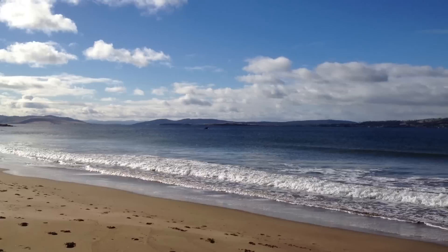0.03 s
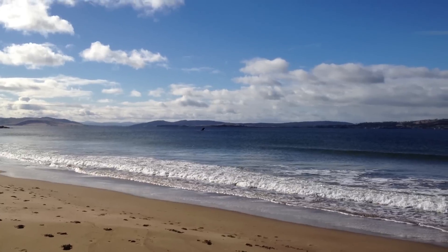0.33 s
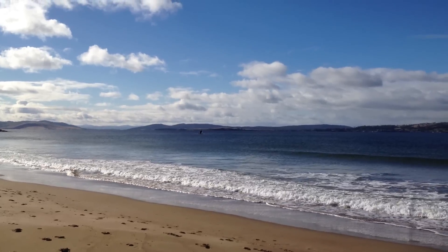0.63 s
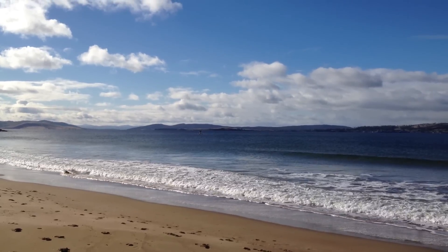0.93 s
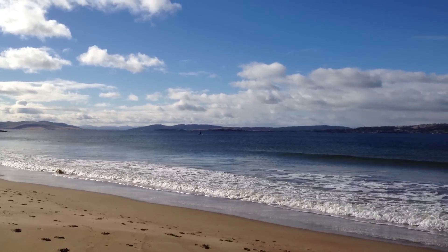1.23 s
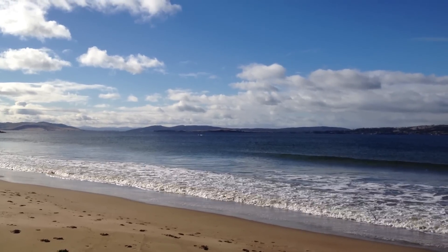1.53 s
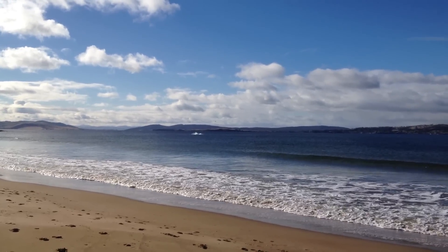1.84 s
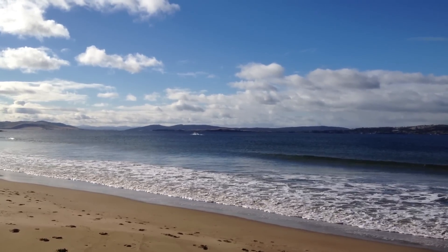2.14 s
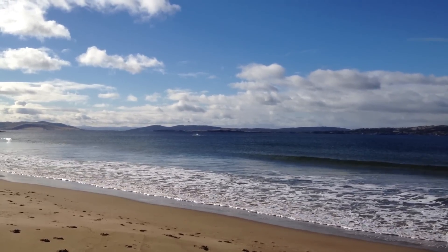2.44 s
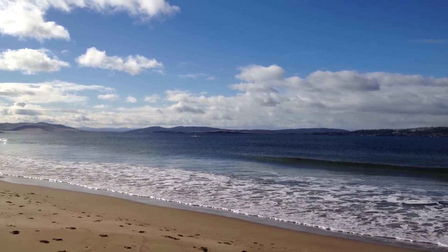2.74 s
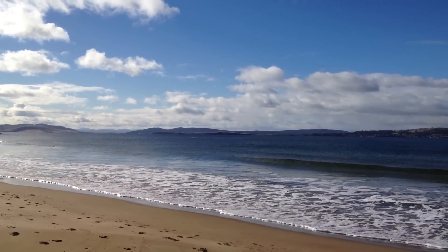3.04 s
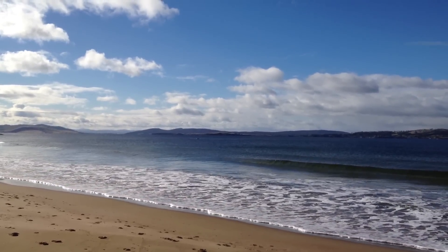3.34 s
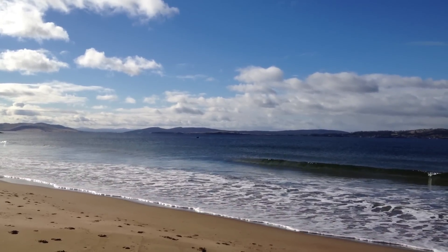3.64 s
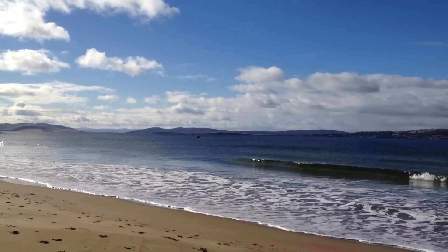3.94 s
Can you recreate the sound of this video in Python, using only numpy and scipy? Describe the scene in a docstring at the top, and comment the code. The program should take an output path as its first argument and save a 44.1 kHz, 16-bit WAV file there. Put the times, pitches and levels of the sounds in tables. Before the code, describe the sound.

A wave washes up a sandy beach while gusts of wind buffet the microphone.

```python
"""Wave on a windy beach

A broken wave rolls up the sand, and the roar of its countless bubbles sinks into a thin hiss of foam.
Nearer bubbles ring in the swash among a few small splashes; fine grains, likely blown sand, tick.
Turbulent wind presses on the microphone in short gusts and sharp buffets, hardest near the end."""
import sys
import numpy as np
from scipy import signal
from scipy.fft import rfft, irfft
from scipy.io import wavfile
from scipy.ndimage import uniform_filter1d

SR = 44100
rng = np.random.default_rng(int(sys.argv[2]) if len(sys.argv) > 2 else 0)


def file_out(sig):
    """Save sig as 16-bit WAV at sys.argv[1]."""
    # one column per channel
    cols = np.atleast_2d(sig).T
    # limit, then scale
    lim = np.clip(cols, -1, 1)
    pcm = np.round(lim * 32767).astype(np.int16)
    wavfile.write(sys.argv[1], SR, pcm)


N = 176400

# Envelopes of the rolling front and of the foam: time_s, relative_level_db
ROAR_LEVEL = [(.05, -36.5), (.6, -36), (1.15, -37), (1.75, -37), (2.1, -37), (2.35, -40), (2.55, -44),
              (2.78, -48), (3.3, -48.5), (3.44, -44), (3.64, -48), (3.9, -45.5)]
HISS_LEVEL = [(0.05, -44.5), (0.08, -44.5), (1.38, -44.5), (1.45, -43), (2.23, -44), (2.79, -50),
              (2.85, -48), (2.96, -50.5), (3.87, -50.5), (4.0, -47.5)]
# Their spectra: frequency_hz, gain_db
ROAR_SPECTRUM = [(30, -50), (70, -23), (150, -2.5), (280, -1), (420, -2), (620, -0.5), (950, -3),
                 (1500, -5.5), (2150, -7.5), (2600, -20), (4500, -38), (9000, -64)]
HISS_SPECTRUM = [(300, -29), (1000, -2), (2100, -0.5), (2600, -0.5), (3200, 2), (4200, -1.5), (5400, -4.5),
                 (6300, -4), (7900, -4), (9700, -13.5), (11500, -21), (13700, -18.5), (15400, -22)]

def white_water(roar_gain_db=1.5, hiss_gain_db=1.45):
    """Incoherent bubble sounds add up to noise: a low roar at the front, a hiss in the foam."""
    roar = amp(roar_gain_db + curve(ROAR_LEVEL)) * churn(ROAR_SPECTRUM, patchy_db=1.25)
    hiss = amp(hiss_gain_db + curve(HISS_LEVEL)) * churn(HISS_SPECTRUM, patchy_db=.88)
    return roar + hiss


def churn(spectrum, patchy_db, flicker_db=.5):
    """A bubble cloud is noise modulated in amplitude, both in patches and across all bands at once."""
    frames = signal.stft(rng.standard_normal(N), nperseg=512, noverlap=384)[2].T
    drift = uniform_filter1d(rng.standard_normal(frames.shape), size=18, axis=0)
    patches = unit_rms(uniform_filter1d(drift, size=8, axis=1))
    flicker = unit_rms(uniform_filter1d(rng.standard_normal(len(frames)), size=7))[:, None]
    frames *= amp(patchy_db * patches + flicker_db * flicker)
    return coloured(signal.istft(frames.T, nperseg=512, noverlap=384)[1][:N], spectrum)


def bubbles(sizes=30, per_s=1400, level_db=-56.5, decay_cycles=7.9):
    """Each near bubble is a damped oscillator whose pitch rises as it rings down."""
    t, out = np.arange(0, .04, 1 / SR), np.zeros(N)
    for hz in np.geomspace(700, 8000, sizes):
        age = t * hz / decay_cycles
        glide = 1 + .03 * np.minimum(age, 4)
        ring = np.sin(2 * np.pi * hz * t * glide) * np.exp(-age)
        out += signal.oaconvolve(impulses(per_s / sizes, spread_db=1), ring)[:N]
    foam_envelope = amp(.42 * curve(HISS_LEVEL))
    return amp(level_db) * unit_rms(out * foam_envelope)


# Puffs of spray: centre_s, level_db, centre_hz, sigma_hz, sigma_s
SPLASH_EVENTS = [(2.838, -49.5, 2500, 590, .012), (3.252, -42.5, 2820, 700, 0.0041),
                 (3.271, -46, 13600, 1300, 0.0027), (3.272, -52, 8000, 1200, .004),
                 (3.397, -46, 3600, 1300, 0.0046)]

def splashes():
    """Spray radiates bursts of band-limited noise, Gaussian in time and in frequency."""
    t, f, out = np.arange(N) / SR, np.fft.rfftfreq(N, 1 / SR), np.zeros(N)
    for centre_s, db, hz, sigma_hz, sigma_s in SPLASH_EVENTS:
        band = gaussian(f - hz, sigma_hz)
        spray = unit_rms(irfft(rfft(rng.standard_normal(N)) * band, N))
        out += amp(db) * spray * gaussian(t - centre_s, sigma_s)
    return out


# Gusts on the microphone: start_s, length_s, level_db
GUST_EVENTS = [(0.199, 0.079, -32), (0.358, 0.018, -31), (.552, 0.058, -33), (0.86, 0.058, -29.5),
               (1.352, 0.073, -31), (1.507, 0.043, -34), (1.56, 0.018, -23), (1.602, 0.047, -23.5),
               (1.703, 0.051, -27.5), (1.785, .10, -30.5), (1.898, 0.033, -30), (1.986, 0.044, -33.5),
               (2.269, .045, -32), (2.438, 0.056, -23), (2.494, .128, -36), (2.821, 0.16, -33.5),
               (2.985, 0.052, -32), (3.057, 0.049, -33), (3.161, .052, -30), (3.601, 0.16, -33.5),
               (3.773, 0.018, -23), (3.799, 0.026, -18.5), (3.837, 0.11, -22.5), (3.972, .04, -23.5)]
# Spectra of the low flutter and of its rough edge: frequency_hz, gain_db
FLUTTER_SPECTRUM = [(25, -46), (45, -32), (80, -16.5), (125, -3), (175, 2.5), (255, -3.5), (320, -16.5),
                    (430, -23.5), (700, -34.5), (1500, -56), (3000, -100)]
EDGE_SPECTRUM = [(30, -31), (100, 1), (220, -4), (340, 3), (500, -7.5), (800, -19), (1300, -32),
                 (2500, -55), (4000, -90)]

def gusts(breeze_db=-49, attack_s=.0094, release_s=.011, edge_db=-5, reference_db=-22.5):
    """Turbulent pressure flutters on the microphone; a rough edge grows as its amplitude squared."""
    t, power = np.arange(N) / SR, np.full(N, amp(breeze_db) ** 2)
    for start, length, db in GUST_EVENTS:
        rise = (1 + np.tanh(2 * (t - start) / attack_s)) / 2
        fall = (1 + np.tanh(2 * (start + length - t) / release_s)) / 2
        power += amp(db) ** 2 * rise * fall
    strength = np.sqrt(power)
    flutter = coloured(rng.standard_normal(N), FLUTTER_SPECTRUM)
    local_power = uniform_filter1d(uniform_filter1d(flutter ** 2, size=1000), size=700)
    flutter /= np.sqrt(local_power + 1e-6)  # steadied, so the gusts set its level
    edge_gain = amp(edge_db) * strength / amp(reference_db)
    edge = edge_gain * coloured(rng.standard_normal(N), EDGE_SPECTRUM)
    return strength * (flutter + edge)


# Eddies striking the microphone: centre_s, peak_db, centre_hz
EDDIES = [(.250, -12.5, 150), (0.291, -21, 158), (0.301, -21.5, 176), (.594, -22.5, 194),
          (.885, -17.5, 186), (.905, -29, 178), (1.368, -15.5, 203), (1.421, -26, 170), (1.622, -16, 172),
          (1.638, -14.5, 200), (1.642, -19, 520), (1.728, -19, 328), (1.735, -11.5, 174),
          (1.790, -19.5, 190), (1.807, -21.5, 170), (1.851, -15.5, 222), (1.871, -11, 160),
          (2.003, -20, 180), (2.441, -11, 245), (2.463, -11, 190), (2.474, -11, 180), (2.516, -19.5, 190),
          (2.542, -22.5, 173), (2.848, -23.5, 158), (2.873, -22, 159), (2.927, -19.5, 192),
          (2.947, -21, 268), (3.001, -20.5, 170), (3.093, -29, 179), (3.277, -30.5, 158), (3.341, -29, 149),
          (3.625, -24, 160), (3.707, -23, 171), (3.815, -13.5, 714), (3.852, -8, 536), (3.876, -12, 380),
          (3.882, -0.5, 217), (3.901, -4, 225), (3.909, -3.5, 297), (3.935, -9, 242), (3.950, -12, 282)]

def buffets(size=4096, low_cut_hz=85):
    """Each eddy is one pressure swing without resonance, thinned by the microphone's bass roll-off."""
    f, out = np.fft.rfftfreq(size, 1 / SR) + 1, np.zeros(N + size)
    low_cut = 1 / np.sqrt(1 + (low_cut_hz / f) ** 4)
    for centre_s, db, hz in EDDIES:
        log_width = .35 * (hz / 200) ** .17  # quicker eddies span a wider band
        band = low_cut * gaussian(np.log(f / hz), log_width)
        phasor = np.exp(2j * np.pi * rng.random())
        swing = np.fft.fftshift(irfft(band * phasor))
        out[round(centre_s * SR) - size // 2:][:size] += amp(db) * swing / abs(swing).max()
    return out[:N]


# Envelope of the fine ticking: time_s, level_db
GRAIN_LEVEL = [(0, -59), (.6, -58), (.97, -56), (1.1, -68), (1.5, -62), (1.8, -80), (2.45, -77),
               (2.75, -64), (3.2, -56.5), (3.36, -55), (3.45, -67), (3.72, -52), (3.9, -60.5)]
# Spectrum of an impact: frequency_hz, gain_db
GRAIN_SPECTRUM = [(1500, -26), (4000, -7), (8000, 5), (10500, -3), (13500, 3), (17000, -3.5)]
# The largest grains: start_s, peak_db
LARGE_GRAINS = [(.8845, -35), (0.9715, -34), (1.5251, -37), (2.43, -38), (2.8715, -41), (3.1359, -38),
                (3.1833, -38), (3.203, -38), (3.2695, -36), (3.357, -37), (3.6861, -39), (3.7545, -35)]

def grains(per_s=1100, decay_s=.00099):
    """Random grain impacts on the microphone housing make shot noise, with a few louder ticks."""
    out = amp(curve(GRAIN_LEVEL)) * coloured(impulses(per_s, spread_db=4.2), GRAIN_SPECTRUM)
    t = np.arange(0, .02, 1 / SR)
    for start, db in LARGE_GRAINS:
        tick = coloured(rng.standard_normal(len(t)) * np.exp(-t / decay_s), GRAIN_SPECTRUM)
        out[round(start * SR):][:len(t)] += amp(db) * tick / abs(tick).max()
    return out


def impulses(per_s, spread_db):
    """A Poisson process of clicks, a few larger than the rest."""
    clicks = (rng.random(N) < per_s / SR) * rng.choice([-1, 1], N)
    return clicks * amp(spread_db * np.minimum(rng.exponential(1, N), 4))


def coloured(x, spectrum):
    """Filtering by a gain curve on a log-frequency axis, at unit rms."""
    hz, db = np.transpose(spectrum)
    f = np.fft.rfftfreq(len(x), 1 / SR)
    gain = amp(np.interp(np.log(f + 1), np.log(hz + 1), db))
    return unit_rms(irfft(rfft(x) * gain, len(x)))


def amp(db):
    """Decibels to amplitude ratio."""
    return 10 ** (np.asarray(db) / 20)


def unit_rms(x):
    """Normalisation to an rms of one."""
    return x / np.sqrt(np.mean(x ** 2) + 1e-20)


def curve(points):
    """Linear interpolation of (time_s, value) points."""
    return np.interp(np.arange(N) / SR, *np.transpose(points))


def gaussian(offset, sigma):
    """A bell curve of unit height."""
    return np.exp(-.5 * (offset / sigma) ** 2)


def scene():
    """Surf, wind and grains add by superposition in one channel."""
    surf = white_water() + bubbles() + splashes()
    return (surf + gusts() + buffets() + grains())[None]


def record(dry, start_s=.036, cutoff_hz=15350):
    """The sound starts after a brief silence, clipped at full scale and low-pass filtered."""
    live = np.clip(dry, -1, 1) * (np.arange(N) / SR > start_s)
    low_pass = signal.firwin(511, cutoff_hz, window=("kaiser", 9), fs=SR)
    return signal.oaconvolve(live, low_pass[None], "same")


dry = scene()
out = record(dry)
file_out(out)
```